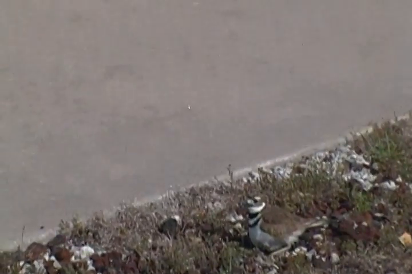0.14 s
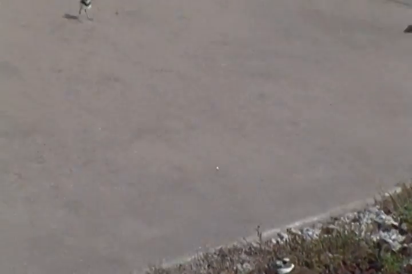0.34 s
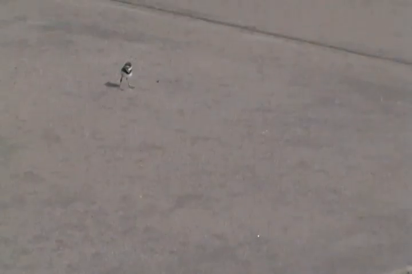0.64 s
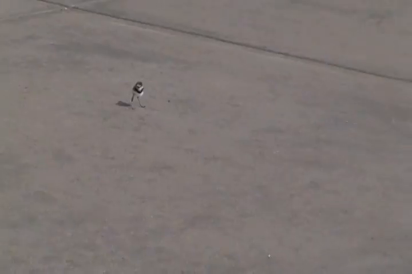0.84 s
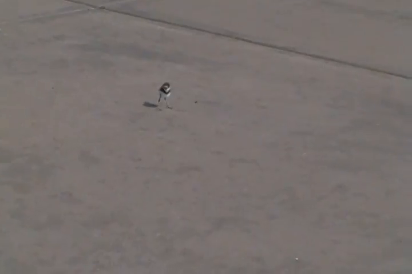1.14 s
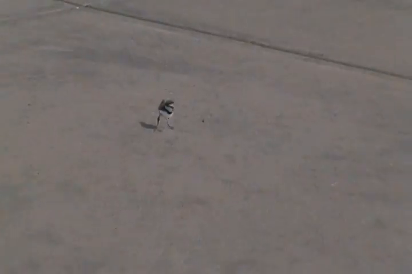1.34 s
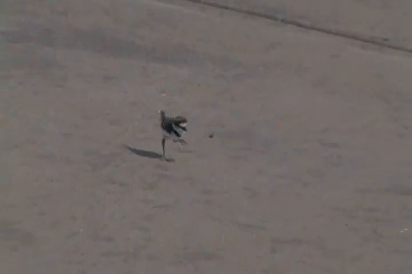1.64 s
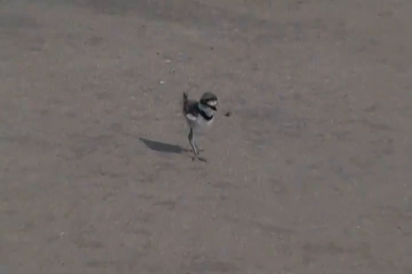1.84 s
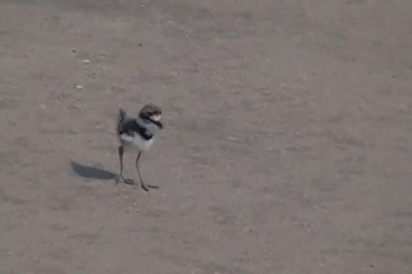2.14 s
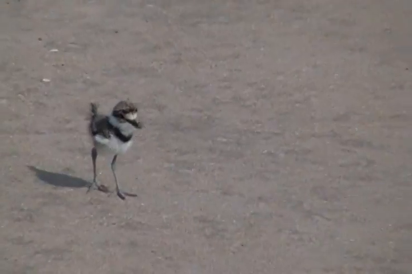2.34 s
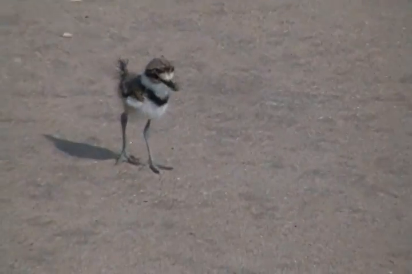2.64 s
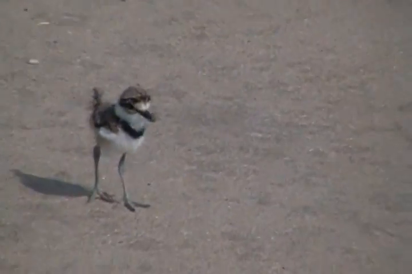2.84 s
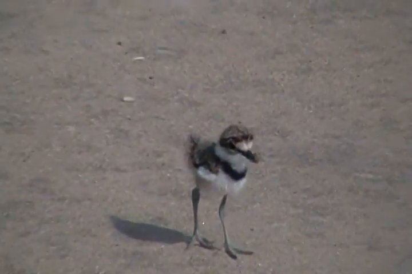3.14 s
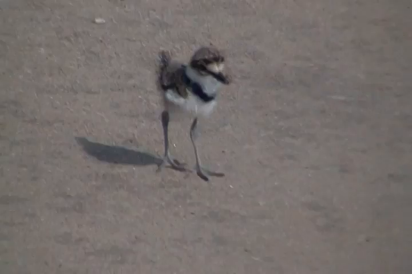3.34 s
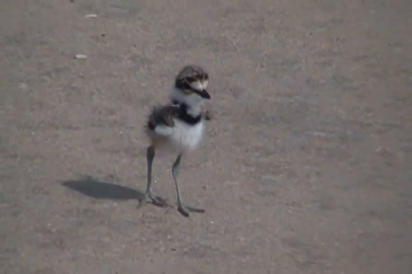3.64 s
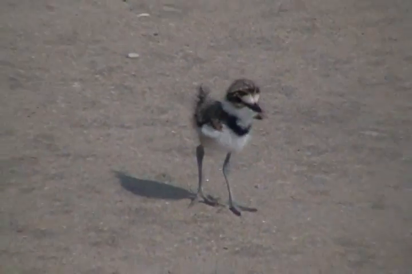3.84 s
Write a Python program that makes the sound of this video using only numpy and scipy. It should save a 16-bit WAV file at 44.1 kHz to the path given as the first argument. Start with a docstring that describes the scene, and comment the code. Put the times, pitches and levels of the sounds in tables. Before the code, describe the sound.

A plover gives one long, thin, high call close by from 0.3 to 0.7 seconds, with a slight echo. Shorter, farther calls come at 1.8 and 3.6 seconds, among brief whistles of other birds. Wind rumbles on the microphone throughout, swelling from about 2.1 seconds into a loud gust with crackling ticks. A button snaps once at 3.2 seconds. A faint hiss of air and distant traffic lies underneath.

```python
"""A plover in the wind

A plover calls on open paved ground near a wall: one long near call and two far ones, among short
whistles of other birds, all gliding tones with echo and diffuse tail. Wind buffets the ports of a
hand-held stereo microphone and swells into a gust that overloads it in ticks; a button snaps once.
Far traffic and air hiss lie below; the recorder limits the peaks."""
import sys
import numpy as np
from scipy import signal
from scipy.io import wavfile
from scipy.ndimage import uniform_filter1d

SR = 44100
rng = np.random.default_rng(int(sys.argv[2]) if len(sys.argv) > 2 else 0)


def dump_mix(stems):
    """Bounce the given channels to the path in sys.argv[1] as a 16-bit WAV at rate SR."""
    frames = np.atleast_2d(stems).T  # one column per channel
    limited = np.clip(frames, -1, 1)  # hard clip at full scale
    pcm = np.round(limited * 32767).astype(np.int16)
    wavfile.write(sys.argv[1], SR, pcm)


N = 176400
TIME = np.arange(N) / SR


def amp(db):
    """Amplitude grows tenfold for every 20 dB."""
    return 10 ** (np.asarray(db) / 20)


def pan(db):
    """A level difference, left minus right, places a sound between the channels."""
    return amp(db * np.array([[.5], [-.5]]))


def unit_rms(x):
    """Normalisation to unit mean power."""
    return x / np.sqrt(np.mean(x ** 2) + 1e-20)


def at_hz(points, hz):
    """Interpolation on a logarithmic frequency axis."""
    return np.interp(np.log(hz), np.log(np.array(points)[:, 0]), np.array(points)[:, 1])


def drift(rate_hz):
    """Low-passed noise wanders slowly, with unit spread."""
    pole = np.exp(-80 * np.pi * rate_hz / SR)
    slow = signal.lfilter([1], [1, -2 * pole, pole * pole], rng.standard_normal(N // 40 + 2002))[2000:]
    return np.interp(np.arange(N) / 40, np.arange(len(slow)), unit_rms(slow))


def band_noise(spectrum, correlation, low_hz, count, gain_db):
    """Half-octave noise bands add to unit power; the mid-to-side ratio sets their stereo correlation."""
    out, edges = 0, low_hz * 2 ** (np.arange(count + 1) / 2)
    white = rng.standard_normal((2, 2, N))
    for k in range(count):
        band = signal.butter(2, edges[k:k + 2], "band", fs=SR, output="sos")
        mid, side = signal.sosfilt(band, white[k % 2])
        hz = np.sqrt(edges[k] * edges[k + 1])
        alike = np.clip(at_hz(correlation, hz), -1, 1)
        stereo = np.sqrt(1 + alike) * mid + np.sqrt(1 - alike) * side * [[1], [-1]]
        out = out + amp(at_hz(spectrum, hz) + gain_db(hz)) * stereo
    return unit_rms(out)


def glide(rows):
    """Phase is the integral of pitch. Gives samples, phase, a faded unit-rms gain and other columns."""
    s, *columns = np.transpose(rows)
    i = np.arange(int(s[0] * SR), min(int(s[-1] * SR), N))
    hz, *levels = [uniform_filter1d(np.interp(i / SR, s, c), size=130) for c in columns]
    fade = np.clip(np.minimum(i - i[0], i[-1] - i) / (0.00067 * SR), 0, 1)
    return i, 2 * np.pi * np.cumsum(hz) / SR, fade * np.sqrt(2), *levels


def overload_pulse(impulses, cusp_s=0.00019, crest_s=0.0018, edge_hz=9500):
    """Convolution makes each impulse a pointed cusp on a broader crest; a high-pass adds an edge."""
    t = np.abs(np.arange(-600, 601)) / SR
    pulse = np.exp(-t / cusp_s) + amp(-9) * np.exp(-(t / crest_s) ** 2)
    edge = signal.sosfilt(signal.butter(1, edge_hz, "high", fs=SR, output="sos"), impulses + 1e-18)
    return signal.fftconvolve(impulses, pulse[None], "same", axes=1) + amp(-5.5) * edge


# Wind on the ports. Each row: time in seconds, then rumble level, upper-band emphasis,
# deep-band emphasis and left minus right, all in dB.
WIND_COURSE = [(0.0, -24, -10, 2, -5), (0.04, -31, -21, 15.5, 4.5), (0.08, -32, -7, 7, -3),
               (0.21, -20, -14, 3, -1.5), (0.26, -25, -11, 7.5, -2.5), (0.46, -24, -18, 4, 1.5),
               (0.62, -22.5, -22, 3, -1), (0.7, -16.5, -34.5, -8, -7), (0.75, -33, -9.5, 7, 6),
               (0.86, -23.5, -25, 7, 1), (0.9, -23.5, -22.5, -21, 34), (0.99, -26, -14, 18.5, -3),
               (1.04, -20, -35, -10, -2), (1.07, -24, -23, -17, 2), (1.1, -37.5, -2, -7, 4),
               (1.14, -17.5, -33, 0, -2.5), (1.22, -20, -46, 2.5, 8), (1.36, -22, -15.5, 9, -4),
               (1.4, -21, -18.5, 0, -8.0), (1.56, -32, -15, 6, 3.5), (1.66, -18.5, -22, 0, 0.5),
               (1.86, -30, -19, 6.5, 1.5), (1.97, -19.5, -24, -10, 3), (2.08, -27, -24, -3, 1),
               (2.14, -7, -34, -14, 1.0), (2.17, -20, -16, -8, 4), (2.21, -9, -21.5, -32, 7.5),
               (2.24, -9.5, -22, -19, 3), (2.36, -11.5, -11.5, 3, 1), (2.42, -10, -13, -19, -4.5),
               (2.519, -9.5, -13.5, -19, 3), (2.55, -11, -8, 0, -4.5), (2.63, -7.5, -9.5, -20, -0.5),
               (2.68, -15, -9.5, -12, 0), (2.73, -8, -11, -25, -7.5), (2.76, -17.5, -9, -1, -4),
               (2.84, -7, -19, -6.5, 12.5), (2.9, -14.5, -9.5, 2, 2), (2.94, -10, -13, -6, 9),
               (2.97, -14, -5.5, -1, -8), (2.999, -4.5, -16, -22, -4), (3.05, -16.5, -8, -23, 7.5),
               (3.1, -7, -11.5, -27, 5), (3.14, -7.5, -16.5, 3, 2.5), (3.24, -9, -13.5, -15, 2),
               (3.27, -9, -8.5, -2, -3.5), (3.31, -7.5, -16, -3.5, -2.5), (3.51, -16.5, -13, -5, 5),
               (3.53, -14.5, -28.5, 0, 1), (3.64, -15.5, -20.5, -18, -0.5), (3.68, -30.5, -8.5, 8, 2),
               (3.699, -9.5, -56, -28, 2.5), (3.78, -9, -19, -11, 4.5), (3.85, -14.5, -8, 0, -3),
               (3.97, -10.5, -17.5, -36, 2.5), (4.0, -22, -11, 5, 5)]
# Colour of the rumble. Each row: frequency in Hz, relative spectral density in dB.
WIND_SPECTRUM = [(12, -36), (20, -5), (65, -1), (157, -5), (345, -19.5), (423, -31), (874, -62.5),
                 (1880, -85), (2080, -69), (2500, -50), (3250, -78), (5500, -120)]
# Width of the rumble. Each row: frequency in Hz, left-right correlation.
WIND_CORRELATION = [(25, 0.8), (60, 1), (130, 0.37), (280, 0.53), (600, 0), (2000, 0)]


def wind(lump_db=5.5, lump_hz=23.7, crackles_per_s=43):
    """Turbulent pressure at the ports rumbles in lumps; the chance of a crackle follows its power."""
    s, *columns = np.transpose(WIND_COURSE)
    db, upper_db, deep_db, pan_db = [np.interp(TIME, s, c) for c in columns]
    lumps = lump_db * np.array([drift(lump_hz), drift(lump_hz)])

    def gain_db(hz):
        upper_share = np.clip(np.log2(hz / 90) / 1.69, 0, 1.3)
        return upper_share * (upper_db + 10 + lumps) + (hz < 45) * (deep_db + 2.5) + 0.5 * drift(3)
    rumble = band_noise(WIND_SPECTRUM, WIND_CORRELATION, low_hz=19.8, count=14, gain_db=gain_db)
    onsets = rng.random((2, N)) < crackles_per_s * amp(db - db.max()) ** 2 * rumble ** 2 / SR
    crackle = amp(-24 + 4.7 * rng.exponential(1, (2, N))) * onsets * np.sign(rumble)
    return (rumble + overload_pulse(crackle)) * amp(db) * pan(pan_db)


# Colour of far traffic and air. Each row: frequency in Hz, relative spectral density in dB.
AIR_SPECTRUM = [(180, -32), (300, -11), (399, -11), (432, -16), (467, -7), (556, -6), (1270, -9.5),
                (1710, -9.5), (5980, -15), (10600, -24.5), (12400, -27.5), (13200, -71)]
# Width of the hiss. Each row: frequency in Hz, left-right correlation.
AIR_CORRELATION = [(300, 1), (1300, 0.66), (3000, 0.86), (6000, 0.41), (8000, 0.011), (10000, -0.1),
                   (13000, 0.29)]


def air_hiss(level_db=-39, gust_share=0.11, smoothing_s=0.8):
    """Incoherent far sources sum to a broad hiss, here a little louder while the gust blows."""
    slow = drift(17)
    s, db = np.transpose(WIND_COURSE)[:2]
    gust_db = uniform_filter1d(np.interp(TIME, s, db), size=int(smoothing_s * SR))
    hiss = band_noise(AIR_SPECTRUM, AIR_CORRELATION, low_hz=308, count=11,
                      gain_db=lambda hz: 0.067 * slow + 1.45 * drift(28))
    return amp(level_db + gust_share * (gust_db - gust_db.mean())) * hiss


# Puffs of air. Each row: middle and length in seconds, pitch in Hz, level and left minus right in dB.
PORT_FLUTTERS = [(0.243, 0.029, 430, -33.5, -15), (0.664, 0.019, 177, -25.5, -6),
                 (0.898, 0.031, 153, -21.5, 2), (2.22, 0.014, 440, -30.5, 16),
                 (2.56, 0.015, 394, -12.5, 14), (2.916, 0.019, 520, -25.5, -6), (3.112, 0.013, 870, -28, 6),
                 (3.149, 0.0087, 564, -21, 16), (3.282, 0.07, 460, -31, -13)]


def flutters():
    """Brief flow across the ports makes band-limited noise under a Gaussian envelope."""
    out, span = np.zeros((2, N)), np.arange(-2200, 2200)
    for s, length, hz, db, pan_db in PORT_FLUTTERS:
        band = signal.butter(2, [hz / 2.15, hz * 1.15], "band", fs=SR, output="sos")
        noise = signal.sosfilt(band, rng.standard_normal((2, len(span))))
        swell = np.exp(-(2 * span / SR / length) ** 2)
        out[:, int(s * SR) + span] += unit_rms(noise + .5 * noise[::-1]) * swell * amp(db) * pan(pan_db)
    return out


# The near plover. Each row: time in seconds, pitch in Hz, level in dB, then the partials
# at 1/2 and 3/2 of the pitch in dB relative to that level.
PLOVER_CALL = [(.259, 4890, -65, -17, -19), (.266, 5225, -24.5, -11.5, -16), (.278, 5306, -20.5, -15, -15),
               (.287, 4770, -25.5, -35, -17), (.298, 4770, -47, -27, -21), (.33, 4630, -39.5, -32, -33),
               (.39, 4594, -37, -40, -34), (.45, 4665, -31.5, -59, -36), (.515, 4710, -32, -17, -34),
               (.53, 4732, -24, -30, -28), (.585, 4765, -24.5, -34, -19), (.615, 4906, -28, -16, -17),
               (.635, 5060, -22.5, -16, -15.5), (.652, 4950, -28.5, -36, -20), (.664, 4960, -54, -24, -20)]


def near_call():
    """Period doubling: partials at 1/2 and 3/2 of the pitch flank a strong tone, most near its ends."""
    out = np.zeros(N)
    i, phase, fade, db, low_db, high_db = glide(PLOVER_CALL)
    tone = np.sin(phase) + amp(low_db) * np.sin(phase / 2) + amp(high_db) * np.sin(phase * 3 / 2)
    octave = amp(-54.5 + .15 * db) * np.sin(2 * phase)   # swells far less than the tone
    waver_db = drift(23)[i]
    out[i] = fade * (amp(db + waver_db) * tone + octave)
    return out


def diffuse_tail(x, t60_s=.72, build_s=0.0094):
    """Scattering from far walls and bushes decays exponentially, partly different in each channel."""
    t = np.arange(int(.8 * SR)) / SR
    noise = rng.standard_normal((3, len(t))) * amp(-60 * t / t60_s) * np.clip(t / build_s, 0, 1)
    tail = noise[0] + .5 * noise[1:]
    return signal.fftconvolve(x[None], tail / np.sqrt(np.sum(tail ** 2) / 2), axes=1)[:, :N]


def wall_echo(x, delay_s=.027, smear_s=0.0042, low_cut_hz=860):
    """A rough wall returns one specular reflection and a smear of weaker ones behind it."""
    t = np.arange(1500) / SR
    response = (t == 0) + 0.051 * rng.standard_normal(len(t)) * np.exp(-t / smear_s / 2)
    delayed = np.roll(x, int(delay_s * SR))
    thinned = signal.lfilter(*signal.butter(1, low_cut_hz, "high", fs=SR), delayed)
    return amp(-8.5) * signal.fftconvolve(thinned, response)[:N]


# Other birds. Each row: start and length in seconds, first, middle and last pitch in Hz, level in dB.
BIRD_WHISTLES = [(0.587, 0.078, 3030, 3030, 3080, -50), (0.677, 0.023, 3080, 2940, 2960, -38),
                 (0.896, 0.017, 3950, 4120, 4390, -47), (0.902, 0.022, 4410, 4520, 4380, -47),
                 (0.919, 0.016, 4160, 4130, 4000, -42), (0.939, 0.052, 3270, 3030, 2800, -47),
                 (1.701, 0.093, 2590, 2340, 2610, -46.5), (1.811, 0.026, 4550, 4620, 4650, -36),
                 (1.826, 0.016, 3130, 3180, 3130, -33), (2.211, 0.032, 4540, 4770, 4920, -32.5),
                 (2.236, .02, 3180, 3120, 3150, -28), (2.622, 0.021, 3070, 3160, 3100, -45),
                 (2.761, 0.035, 4460, 4740, 4900, -35.5), (2.793, 0.019, 3250, 3203, 3150, -30),
                 (2.873, 0.075, 2040, 2050, 2120, -43.5), (3.333, 0.027, 1910, 1970, 2030, -47),
                 (3.353, 0.039, 2030, 2050, 2060, -41), (3.367, 0.03, 3145, 3123, 3080, -30.5),
                 (3.774, 0.026, 3040, 3086, 3100, -33), (3.792, 0.03, 3300, 3160, 3180, -28),
                 (3.8, 0.023, 4800, 4880, 4720, -37.5), (3.782, 0.026, 1540, 1605, 1600, -41.5),
                 (3.837, 0.048, 2066, 2040, 2120, -45), (3.915, 0.015, 4300, 4740, 4900, -42),
                 (3.927, 0.0207, 4640, 4360, 4200, -39), (3.944, 0.025, 4870, 4530, 4350, -43)]


def whistles(waver, wobble, attack_s=.003, release_s=.013):
    """Short gliding sines, modulated in amplitude by waver and in phase by wobble."""
    out = np.zeros(N)
    for s, length, first, middle, last, db in BIRD_WHISTLES:
        i, phase, fade = glide([(s, first), (s + length / 2, middle), (s + length, last)])
        t = i / SR - s
        envelope = np.clip(np.minimum(t / attack_s, (length - t) / release_s), 0, 1)
        out[i] += fade * envelope * amp(db) * waver[i] * np.sin(phase + wobble[i])
    return out


# Crests of the gust. Each row: time in seconds, level in dB, left minus right in dB.
OVERLOAD_TICKS = [(1.218, -16.5, 3), (2.224, -10, 21), (2.2485, -11, 22), (2.3198, -9, 21),
                  (2.337, -8.5, -13), (2.362, -9, 17), (2.3818, -7.5, 21), (2.4642, -10.5, 21),
                  (2.523, -8.5, 16), (2.5796, -7, 32), (2.628, -6, 14), (2.6993, -7.5, 24), (2.73, -9, -22),
                  (2.7751, -7, -36), (2.7767, -9.5, 25), (2.808, -23, 35), (2.951, -8.5, 18),
                  (2.9987, -9.5, 13), (3.0468, -8.5, 17), (3.0871, -9, 16), (3.1477, -1, -2.5),
                  (3.7868, -12, 17)]


def capsule_ticks(rumble):
    """An overloaded capsule ticks; each pulse takes the sign of the rumble on its louder side."""
    s, db, pan_db = np.transpose(OVERLOAD_TICKS)
    impulses, i = np.zeros((2, N)), (s * SR).astype(int)
    louder_side = (pan_db < 0).astype(int)
    impulses[:, i] = amp(db + np.minimum(pan_db * [[1], [-1]], 0)) * np.sign(rumble[louder_side, i])
    return overload_pulse(impulses)


# Two far plover calls, one list each. Each row: time in seconds, pitch in Hz, level in dB.
FAR_PLOVER_CALLS = [
    [(1.797, 5000, -53), (1.804, 5045, -26), (1.813, 5200, -28), (1.826, 5050, -28), (1.831, 4880, -44),
     (1.836, 4790, -32), (1.843, 4550, -31), (1.847, 4280, -51), (1.853, 4130, -37), (1.865, 4100, -40.5),
     (1.891, 4290, -42), (1.905, 4330, -44), (1.914, 4470, -67), (1.919, 4520, -37), (1.94, 4620, -38),
     (1.959, 4680, -37), (1.968, 4340, -45)],
    [(3.637, 4950, -57), (3.646, 5200, -29), (3.659, 5110, -33), (3.664, 4960, -46), (3.669, 4900, -31),
     (3.675, 4670, -34), (3.679, 4360, -54), (3.684, 4250, -36), (3.703, 4350, -44), (3.711, 4500, -54),
     (3.717, 4540, -38), (3.743, 4800, -39), (3.777, 4830, -40), (3.786, 4770, -64)],
]
# A far note of nearly steady pitch. Each row: time in seconds, pitch in Hz, level in dB.
HELD_NOTE = [(3.745, 4119, -50), (3.771, 4120, -39), (3.791, 4125, -50), (3.809, 4100, -34),
             (3.825, 4090, -43), (3.841, 4129, -36), (3.85, 4125, -48), (3.862, 4100, -37),
             (3.885, 4090, -35), (3.896, 4090, -46), (3.905, 4095, -41), (3.915, 4090, -47),
             (3.925, 4100, -38), (3.955, 4129, -50)]


def far_calls(wobble):
    """Each far call is one gliding partial, roughened by slight phase modulation."""
    out = np.zeros(N)
    for rows in [*FAR_PLOVER_CALLS, HELD_NOTE]:
        i, phase, fade, db = glide(rows)
        out[i] += fade * amp(db) * np.sin(phase + 0.4 * wobble[i])
    return out


# The button's contacts. Each row: start in seconds, level in dB, time to fall 60 dB in seconds,
# relative level of the shell's modes in dB.
SNAP_CONTACTS = [(3.2059, 7, .0045, -6), (3.2082, -2, .01, 2), (3.211, -1, .016, -9)]
# Low modes of the shell. Each row: frequency in Hz, relative level in dB.
SHELL_MODES = [(1200, -5), (1640, 3), (2290, -22)]
# Colour of the rattle. Each row: frequency in Hz, relative spectral density in dB.
RATTLE_SPECTRUM = [(470, -40), (800, -20), (1210, -4), (2580, -5), (3400, -1), (4590, -2), (5700, 0),
                   (6500, -6), (8350, -3), (9500, -20), (11700, -18), (13200, -37)]
# Width of the rattle. Each row: frequency in Hz, left-right correlation.
RATTLE_CORRELATION = [(900, 0.23), (3000, 1), (6000, 0.62), (8000, 0.22), (11000, -0.34)]


def button_snap(ring_hz=3700, attack_s=0.0002):
    """Three impacts excite a broad rattle and damped modes of the shell; the first also rings high."""
    rattle = band_noise(RATTLE_SPECTRUM, RATTLE_CORRELATION, low_hz=960, count=8, gain_db=lambda hz: 0)
    out = np.zeros((2, N))
    for k, (s, db, t60, shell_db) in enumerate(SNAP_CONTACTS):
        t = TIME - s
        envelope = amp(db - 60 * np.clip(t, 0, .1) / t60) * np.clip(t / attack_s, 0, 1)
        modes = sum(amp(shell_db + mode_db) * np.sin(2 * np.pi * hz * t) for hz, mode_db in SHELL_MODES)
        if k == 0:
            modes += amp(-6) * np.sin(2 * np.pi * ring_hz * t)
        out += envelope * (0.92 * rattle + modes)
    return out


def scene(wobble_hz=25.65, far_echo_s=.032, capsule_ceiling=.72):
    """Superposition: the birds, their reflections, the wind, the snap and the hiss add as pressures."""
    near = near_call()
    waver = amp(3 * drift(37))
    wobble = 2 * np.pi * np.cumsum(wobble_hz * drift(38)) / SR
    far = whistles(waver, wobble) + far_calls(wobble)
    rumble = wind()
    echoes = wall_echo(near) + amp(-18) * np.roll(far, int(far_echo_s * SR))
    birds = (near + far + echoes) * pan(3.5) + diffuse_tail(amp(-8.5) * near + amp(-13) * far)
    buffeting = capsule_ceiling * np.tanh(rumble / capsule_ceiling)   # the capsules round off gusts
    return birds + buffeting + capsule_ticks(rumble) + flutters() + button_snap() + air_hiss()


def record(dry, limit_db=-6, attack_s=.002, release_db_per_s=280, sense_hz=400, stopband_hz=13800):
    """Peak limiting, half deaf to bass, ducks the gain; what slips through clips, and the top is cut."""
    sensed = signal.lfilter(*signal.butter(1, sense_hz, "high", fs=SR), dry)
    over_db = np.maximum(20 * np.log10(np.abs(sensed).max(axis=0) + 1e-9) - limit_db, 0)
    release_db = release_db_per_s * TIME
    held_db = np.maximum.accumulate(over_db + release_db) - release_db
    pole = np.exp(-1 / (attack_s * SR))
    duck_db = signal.lfilter([1 - pole], [1, -pole], held_db)
    clipped = np.clip(dry * amp(-duck_db), -1, 1)
    return signal.sosfilt(signal.cheby2(12, 80, stopband_hz, fs=SR, output="sos"), clipped)


dry = scene()
out = record(dry)
dump_mix(out)
```